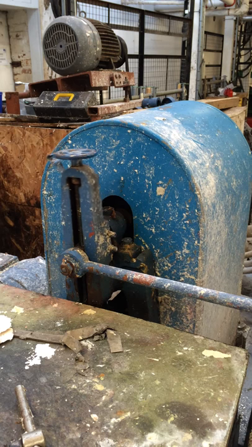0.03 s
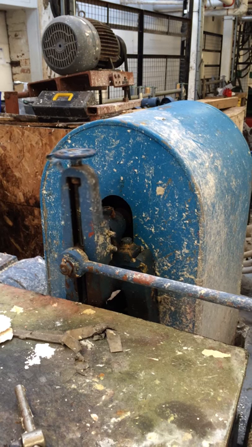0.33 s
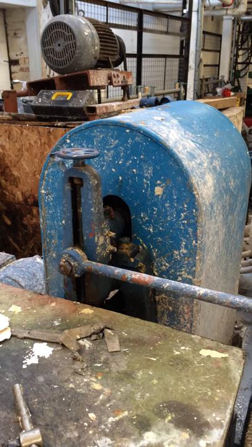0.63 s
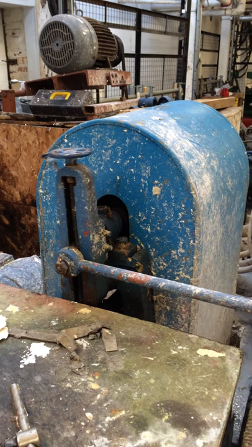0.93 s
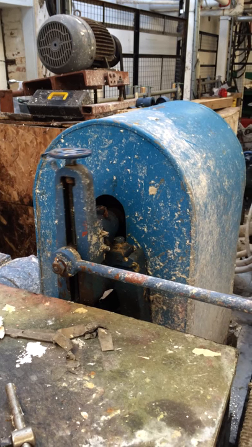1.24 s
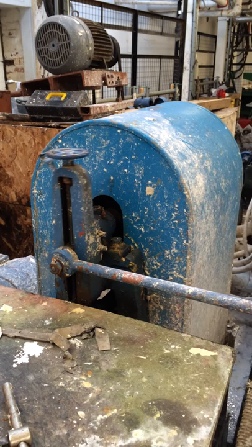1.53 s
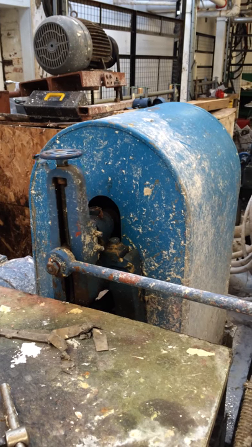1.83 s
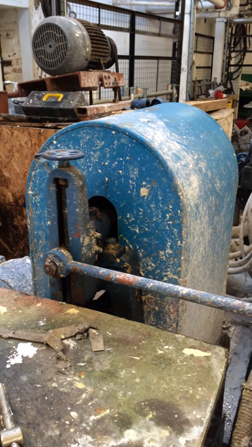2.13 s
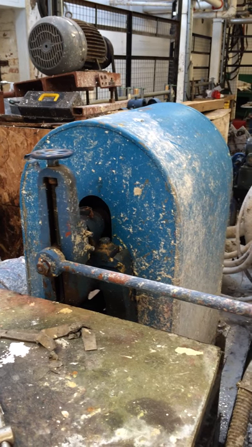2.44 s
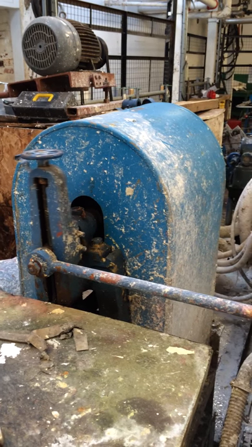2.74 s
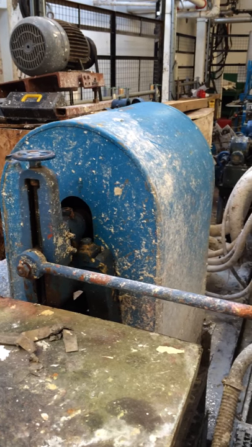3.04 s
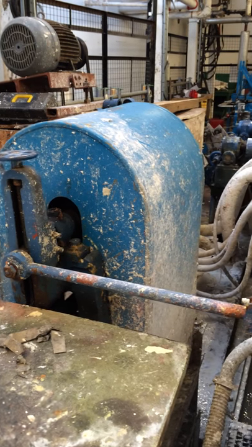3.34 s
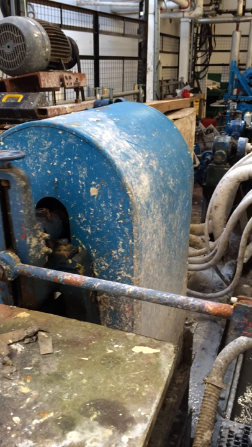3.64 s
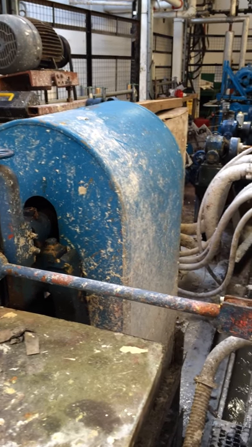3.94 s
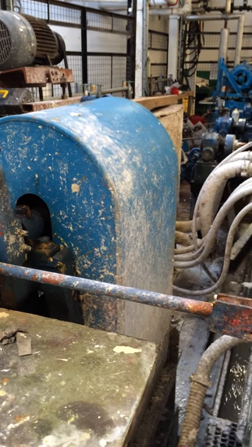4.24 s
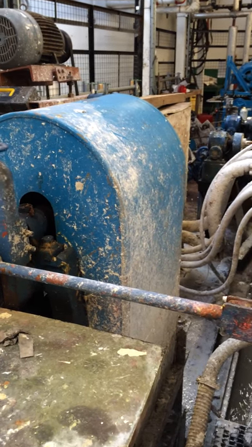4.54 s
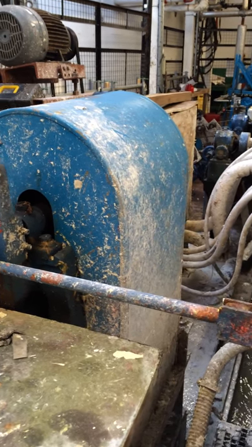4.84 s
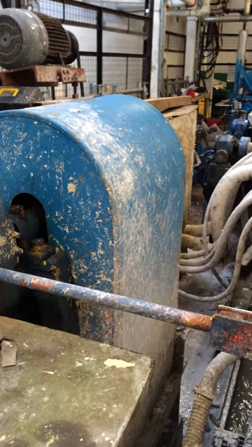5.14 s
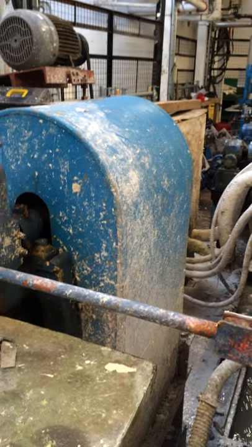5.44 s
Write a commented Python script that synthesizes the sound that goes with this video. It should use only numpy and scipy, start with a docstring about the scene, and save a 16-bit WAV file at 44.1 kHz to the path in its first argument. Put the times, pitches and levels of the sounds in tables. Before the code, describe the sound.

Rapid, wet, rhythmic swishing and scraping from a turning paper machine part, with brief squeaks, against a constant factory roar and hum.

```python
"""A turning part of a paper machine rubs wetly close by, about 5.4 times a second.
Each turn makes a gritty swish that rings the metal round it, followed by a duller scrape.
Thin squeals rise briefly, mostly in the middle, among short squeaks, wet crackle and a few sharp ticks.
Behind it the mill hall roars steadily, with a strong hum from the drive and weaker motor tones."""
import sys
import numpy as np
from scipy import signal
from scipy.fft import rfft, irfft
from scipy.io import wavfile

SR = 44100
rng = np.random.default_rng(int(sys.argv[2]) if len(sys.argv) > 2 else 0)


def put_to_file(sound):
    """Save the sound as 16-bit audio at rate SR, in the file named by the first command-line argument."""
    columns = np.atleast_2d(sound).T  # one column per channel
    safe = np.clip(columns, -1, 1)
    whole_steps = np.round(safe * 32767)
    wavfile.write(sys.argv[1], SR, whole_steps.astype(np.int16))


N = 246078
TIME = np.arange(N) / SR
FREQS = np.fft.rfftfreq(N, 1 / SR)

# Levels in the tables are relative: the functions add their own gains.
# The roar from bass to treble. Each row: frequency in Hz, level in dB.
ROAR_COLOUR = [(20, -84), (45, -67.5), (65, -64), (85, -59), (112, -65), (140, -54), (210, -55), (320, -56),
               (800, -60.5), (1100, -63.5), (1800, -68.5), (3000, -74.5), (4500, -76.5), (7000, -79.5),
               (10500, -83.5), (15000, -85.5)]
# Peaks and dips the hall gives the roar. Each row: frequency in Hz, width in Hz, gain in dB.
HALL_BUMPS = [(113, 11, 2.5), (203, 13, 2.5), (254, 40, -1.5), (339, 11, -3.5), (708, 72, -1.5),
              (833, 24, 0.5), (925, 26, 2.5), (1036, 16, -2.5), (1620, 140, -0.5), (1885, 30, 3.5),
              (2420, 30, 4), (2980, 120, 0.5)]
# Slow swells of the roar. Each row: time in seconds, upper part in dB, deep rumble in dB.
ROAR_LEVELS = [(0.1, -0.5, 0), (0.6, 0, 3), (1.3, -0.3, -3.5), (2.7, 0.2, -3), (3.2, -0.8, -3),
               (3.7, 1, -3), (4.2, 0.9, -1), (5.6, 0.1, -0.5)]
# The low drone of two motors. Each row: time in seconds, level in dB.
DRONE_LEVELS = [(0.1, -33), (1.4, -32), (2.3, -35), (3.1, -36), (3.8, -33.5), (4.5, -35), (5.5, -35.5)]
# Tones of other motors. Each row: pitch in Hz, level in dB, pitch wander in Hz.
MOTOR_TONES = [(633.4, -46, 1.2), (719, -44.5, 2.5), (1194, -51.5, 11.36), (1782, -60, 3.22)]
# The hum of the main drive. Each row: time in seconds, level in dB.
HUM_LEVELS = [(0.12, -22.5), (0.3, -21), (0.45, -23.5), (1.1, -24), (1.8, -25), (2.0, -22.5), (2.3, -24),
              (2.72, -24.3), (2.86, -21), (3.1, -23), (3.6, -25.5), (3.9, -23), (4.25, -26.5),
              (4.55, -22.5), (4.9, -24.5), (5.55, -23.5)]
# The tones in that hum. Each row: multiple of the lowest pitch, level in dB.
HUM_TONES = [(1, -0.5), (2, -21), (3, -27.5)]
# Larger specks that hit. Each row: start in seconds, level in dB.
SPECK_HITS = [(0.4385, -36), (1.8383, -36), (2.8415, -37), (4.0353, -30), (4.3146, -35), (4.4992, -35),
              (4.8095, -33), (5.245, -29), (5.4206, -37)]
# Hard catches that squeak. Each row: start in seconds, level in dB.
HARD_CATCHES = [(0.65, -41), (1.122, -37), (1.18, -40), (1.36, -38), (1.374, -37), (1.738, -36),
                (1.762, -37), (1.838, -39), (1.945, -38)]
# Squeals. Each row: start and length in seconds, lower pitch in Hz, its rise in Hz per second,
# its level in dB, upper pitch in Hz, its level in dB.
SQUEAL_NOTES = [(0.38, 0.1, 2350, 0, -52, 5300, -52), (1.68, 0.47, 2500, 520, -50, 5270, -56),
                (2.18, 0.6, 2850, 230, -45.5, 5640, -54)]
# The two presses in every turn. Each row: start within the turn and length in seconds, level in dB.
TURN_PRESSES = [(0.021, 0.058, 1.0), (0.078, 0.068, 3)]
# The swish from low to high. Each row: frequency in Hz, level in dB.
SWISH_COLOUR = [(1500, 3.5), (2600, 2), (3800, 6.5), (5200, 1.5), (6600, -0.5), (8000, 0), (10400, 2),
                (12000, -5), (15000, -11.5)]
# Where the metal rings, low and high. Each row: frequency in Hz, width in Hz, level in dB.
METAL_LOW = [(4300, 22, 19), (3910, 38, 1), (4300, 45, -33), (4000, 83, 6.5), (4720, 50, 0.5),
             (5300, 35, -20)]
METAL_HIGH = [(8750, 150, -8), (9140, 170, 6), (8200, 260, -3), (10700, 350, -11)]
# Slow swells of the rub. Each row: time in seconds, then swish, low ring and high ring in dB.
RUB_LEVELS = [(0.2, -39.5, -52, -61), (0.55, -41.5, -47, -50), (0.95, -40.5, -52, -56),
              (1.2, -44.5, -44, -45), (1.55, -41.5, -45, -52), (1.75, -36, -45, -51), (2.2, -42, -49, -54),
              (2.6, -40, -46.5, -55), (3.0, -41.5, -49, -58), (3.5, -39.5, -50, -61),
              (4.3, -38.5, -45, -57), (4.85, -41.5, -47, -56), (5.25, -40, -42, -62),
              (5.55, -35.5, -51, -59)]

TURN_S, TURN_START_S = 0.1843, 0.168  # length of a turn, and the start of one of them


def amp(db):
    """Turns decibels into a gain."""
    return 10 ** (np.asarray(db) / 20)


def unit(x):
    """Scales a signal to an average strength (rms) of 1."""
    return x / np.sqrt(np.mean(x ** 2) + 1e-20)


def curves(rows):
    """One curve over time for each level column, with straight lines between the rows."""
    times, *columns = np.transpose(rows)
    return [np.interp(TIME, times, column) for column in columns]


def spectrum(points):
    """Gain at every frequency from (Hz, dB) points."""
    hz, db = np.transpose(points)
    return amp(np.interp(np.log(FREQS + 1), np.log(hz), db))


def resonances(peaks):
    """Gain at every frequency from (Hz, width, dB) ringing peaks."""
    return sum(amp(db) / (1 + ((FREQS - hz) / width) ** 2) for hz, width, db in peaks)


def bumps(rows):
    """Gain at every frequency from (Hz, width, dB) peaks and dips."""
    return amp(sum(db * np.exp(-((FREQS - hz) / width) ** 2) for hz, width, db in rows))


def colour(x, gain):
    """Filters x by a gain per frequency and scales it to strength 1."""
    return unit(irfft(rfft(x) * gain, N))


def noise():
    """An even hiss (white noise)."""
    return rng.standard_normal(N)


def drift(rate_hz):
    """A random wobble of strength 1, up to about the given rate."""
    return colour(noise(), np.exp(-(FREQS / rate_hz) ** 2))


def tone(hz):
    """A pure tone of strength 1 that follows a pitch curve."""
    return np.sqrt(2) * np.sin(2 * np.pi * (np.cumsum(hz) / SR + rng.random()))


def grit(per_s, spread_db, click_share):
    """Tiny clicks of uneven size, mixed with a smooth hiss."""
    size = amp(spread_db * np.minimum(rng.exponential(1, N), 3))
    clicks = size * rng.choice([-1, 1], N) * (rng.random(N) < per_s / SR)
    return np.sqrt(click_share) * unit(clicks) + np.sqrt(1 - click_share) * noise()


def echoes(depth_db, fade_s):
    """Many short echoes boost some frequencies and weaken others."""
    ripple = rfft(noise() * np.exp(-TIME / fade_s)).real
    return amp(depth_db * unit(ripple))


def hits(rows, fade_s):
    """Loudness curve of hits that start at once and fall 60 dB in fade_s."""
    envelope, age = np.zeros(N), np.arange(SR // 10) / SR
    for start, db in rows:
        part = envelope[round(start * SR):][:len(age)]
        part += amp(db - 60 * age / fade_s)[:len(part)]
    return envelope


def hall_roar(level_db=-27.5, churn_db=0.63, flutter_db=0.05, deep_hz=105, low_hz=600):
    """Many distant rolls and pumps merge in the hall; above the rumble the noise churns."""
    air = colour(noise(), spectrum(ROAR_COLOUR) * bumps(HALL_BUMPS) * echoes(depth_db=1.0, fade_s=0.019))
    deep, low = (irfft(rfft(air) / (1 + (FREQS / hz) ** 4), N) for hz in (deep_hz, low_hz))
    upper_db, deep_db = curves(ROAR_LEVELS)
    rumble = deep * amp(deep_db) + (low - deep) * amp(flutter_db * drift(18))
    upper = (air - low) * amp(upper_db + churn_db * drift(35))
    return amp(level_db) * (rumble + upper)


def motors(drone_hz=161.9, drone_db=-2.9, twin_db=-11.0, beat_hz=1.02, lull_s=0.58):
    """Two like motors differ slightly in speed, so their drone throbs; other tones waver in the hall."""
    phase = 2 * np.pi * np.cumsum(drone_hz + 0.4 * drift(4.0)) / SR
    slip = 2 * np.pi * beat_hz * (TIME - lull_s)
    pair = unit(np.sin(phase) - amp(twin_db) * np.sin(phase + slip))
    drone = amp(drone_db + curves(DRONE_LEVELS)[0] + 0.6 * drift(4.6)) * pair
    return drone + sum(amp(db + 4.0 * drift(3.8)) * tone(hz + wander * drift(11.0))
                       for hz, db, wander in MOTOR_TONES)


def drive_hum(pitch_hz=388.65, wander_hz=0.2305, level_db=0.33, sway_db=0.47, shake_db=0.5):
    """The main drive sings one nearly pure note."""
    hz = pitch_hz + wander_hz * drift(1.0)
    note = sum(amp(db) * tone(round(multiple) * hz) for multiple, db in HUM_TONES)
    return amp(level_db + curves(HUM_LEVELS)[0] + sway_db * drift(29) + shake_db * drift(60)) * note


def spatter(level_db=-48, centre_hz=9000, width_hz=3800):
    """Fine wet crackle that goes on between the strokes."""
    drops = grit(per_s=450, spread_db=-7.5, click_share=1.0)
    return amp(level_db) * colour(drops, resonances([(centre_hz, width_hz, 0)]))


def ticks(centre_hz=9500, width_hz=4200):
    """Larger specks hit and die away at once."""
    return hits(SPECK_HITS, fade_s=0.037) * colour(noise(), resonances([(centre_hz, width_hz, 0)]))


def squeaks(level_db=-2.5, pitch_hz=9120, jitter_hz=170):
    """The hardest catches of the rubbing part give a short, thin squeak."""
    return amp(level_db) * hits(HARD_CATCHES, fade_s=0.07) * tone(pitch_hz + jitter_hz * drift(250))


def squeals(force, level_db=1.0, edge_s=0.035, swell_db_per_s=6, upper_rise_hz_per_s=110, jitter_hz=60):
    """A slipping surface sings two rough tones: the upper under pressure, the lower as it eases."""
    out, grip = np.zeros(N), force - force.mean()
    for start, length, low_hz, rise, low_db, high_hz, high_db in SQUEAL_NOTES:
        age = np.clip(TIME - start, 0, length)
        fade = np.minimum(np.minimum(age, length - age) / edge_s, 1)
        lower = low_hz + rise * age, low_db - 3.5 * grip + swell_db_per_s * (age - length / 2)
        upper = high_hz + upper_rise_hz_per_s * age, high_db + 10.0 * grip
        for hz, db in (lower, upper):
            flutter = unit(amp(2.0 * drift(70)))
            out += amp(db) * fade * flutter * tone(hz + jitter_hz * drift(110))
    return amp(level_db) * out


def scrape(level_db=-43, at_s=0.14, width_s=0.034, centre_hz=2700, width_hz=700, uneven_db=3.0):
    """Late in each turn a duller scrape follows the swish."""
    turn_age = (TIME - TURN_START_S) % TURN_S
    swell = np.exp(-((turn_age - at_s) / width_s) ** 2)
    roughness = unit(amp(uneven_db * drift(30)))
    return amp(level_db) * swell * roughness * colour(noise(), resonances([(centre_hz, width_hz, 0)]))


def pressure(rise_s=0.011, sag_db_per_s=31, fade_s=0.11, uneven_db=1.4):
    """Force on the rubbing part: each press rises, sags and dies away, much the same in every turn."""
    force = np.zeros(N)
    for start, length, db in TURN_PRESSES:
        age = (TIME - TURN_START_S - start) % TURN_S
        fall_db = sag_db_per_s * age + 60 * np.maximum(age - length, 0) / fade_s
        press = np.minimum(age / rise_s, 1) * amp(db - fall_db)
        force = np.maximum(force, press)
    return force * amp(uneven_db * drift(2.7))


def rub(force, swish_db=-1.0, low_db=-6.5, sing_db=-7.0, high_db=-1.5, catch_hz=60):
    """As it presses, the turning part catches unevenly; its grit swishes and rings the metal."""
    swish_gain, low_gain, high_gain = force * amp(curves(RUB_LEVELS))
    grains = grit(per_s=2600, spread_db=4.5, click_share=0.75)
    bass_cut = FREQS / np.hypot(FREQS, 900)
    body = spectrum(SWISH_COLOUR) * bass_cut * echoes(depth_db=3.5, fade_s=0.012)
    catches = unit(amp(0.96 * drift(catch_hz)))
    swish = amp(swish_db) * swish_gain * colour(grains, body) * catches
    # friction keeps the strongest low ring singing through the stroke
    singing = amp(sing_db) * tone(METAL_LOW[0][0] + 45 * drift(84.0))
    low_ring = low_gain * (amp(low_db) * colour(grains, resonances(METAL_LOW)) + singing)
    # the high rings die fast, so they come in quick flashes
    flashes = amp(high_db) * high_gain * unit(amp(3.5 * drift(catch_hz)))
    high_ring = flashes * colour(grains, resonances(METAL_HIGH))
    return swish + low_ring + high_ring


def scene():
    """Adds all the sounds into one channel; the same force drives the rub and the squeals."""
    force = pressure()
    background = hall_roar() + drive_hum() + motors()
    return (background + rub(force) + scrape() + squeaks() + spatter() + squeals(force) + ticks())[None]


def record(dry):
    """Keeps the first 0.12 seconds silent and cuts the treble above 15300 Hz."""
    treble_cut = signal.firwin(511, 15300, window=("kaiser", 9), fs=SR)
    return signal.oaconvolve(dry * (TIME >= 0.12), treble_cut[None], "same")


dry = scene()
out = record(dry)
put_to_file(out)
```